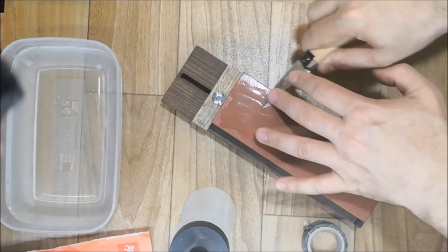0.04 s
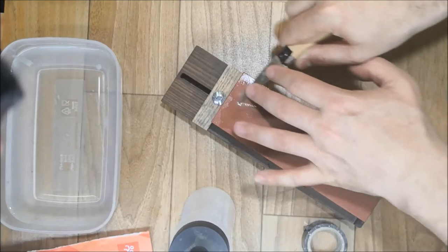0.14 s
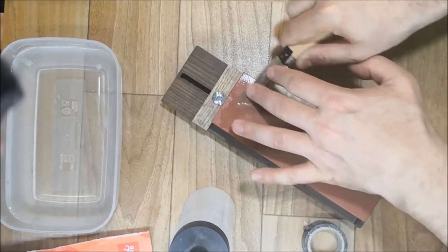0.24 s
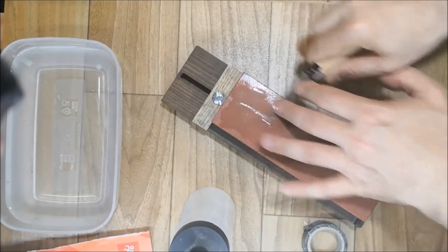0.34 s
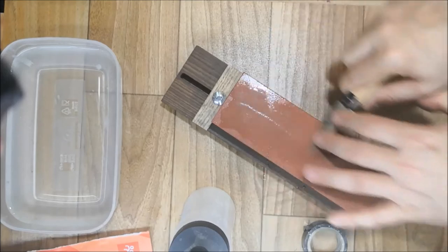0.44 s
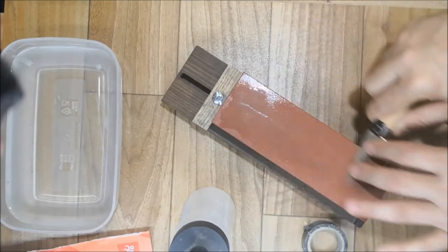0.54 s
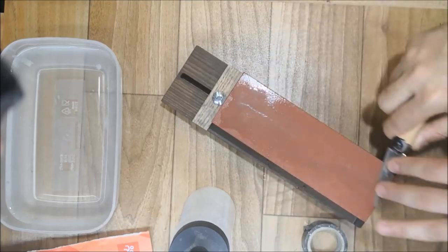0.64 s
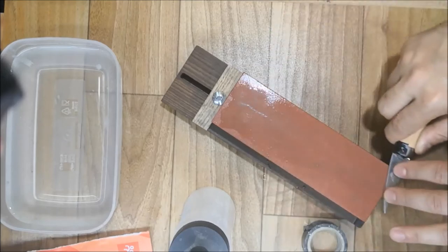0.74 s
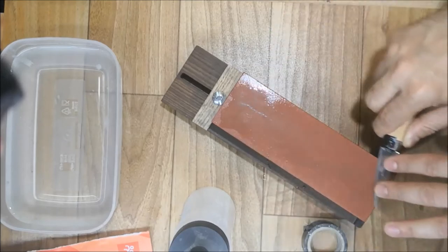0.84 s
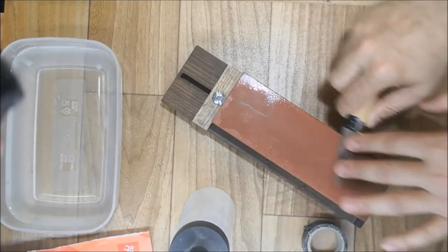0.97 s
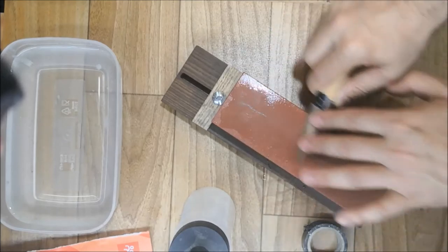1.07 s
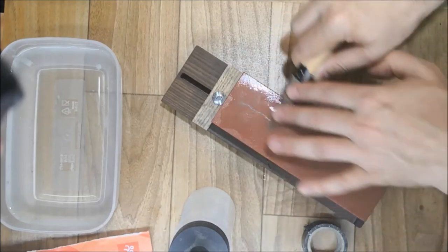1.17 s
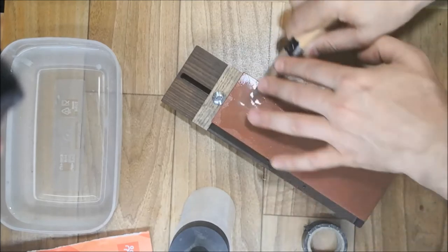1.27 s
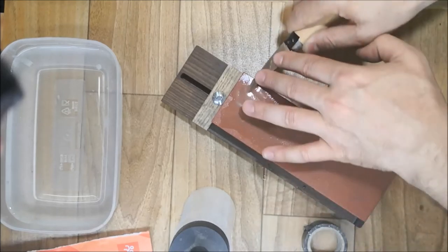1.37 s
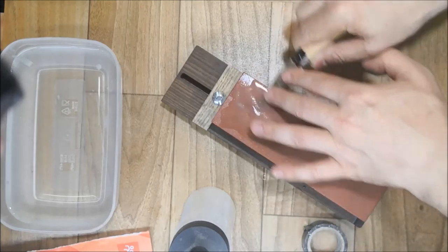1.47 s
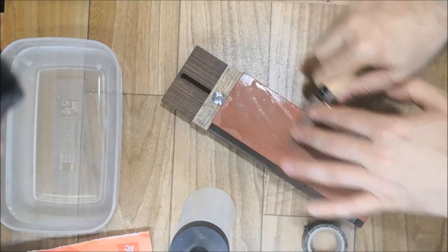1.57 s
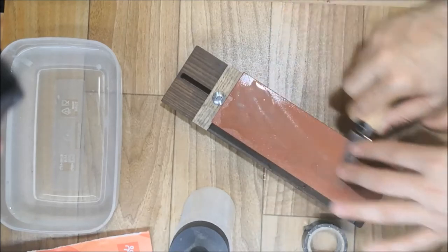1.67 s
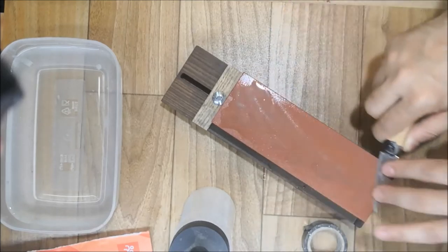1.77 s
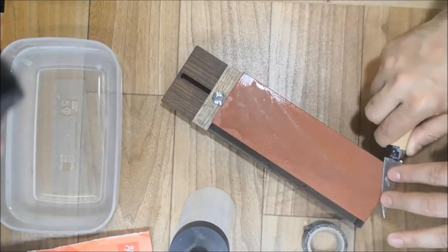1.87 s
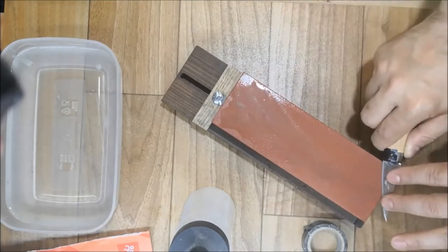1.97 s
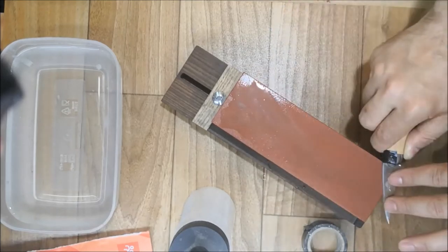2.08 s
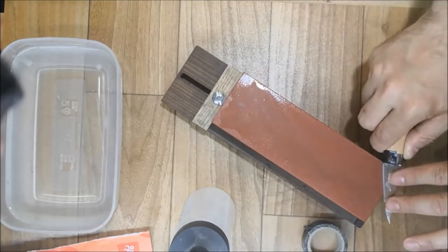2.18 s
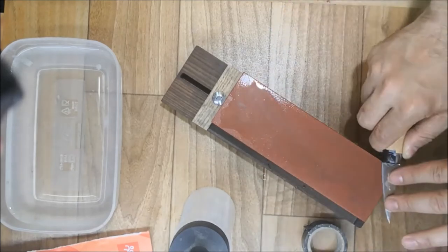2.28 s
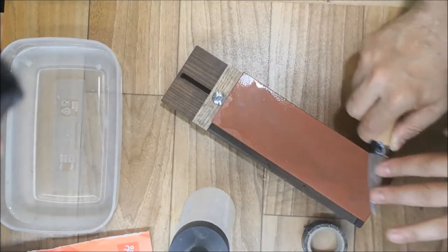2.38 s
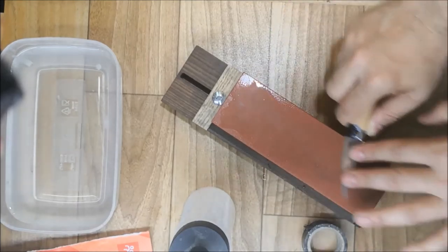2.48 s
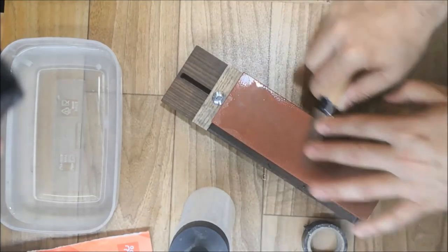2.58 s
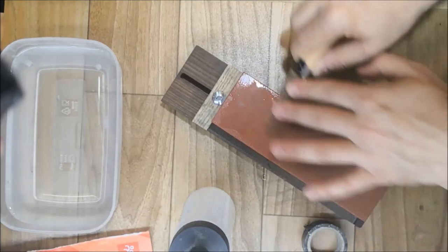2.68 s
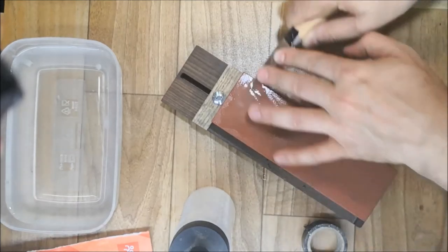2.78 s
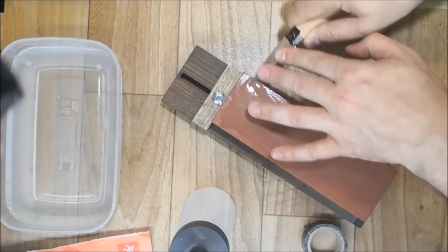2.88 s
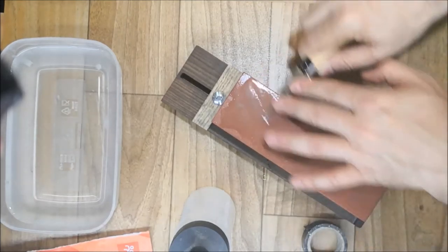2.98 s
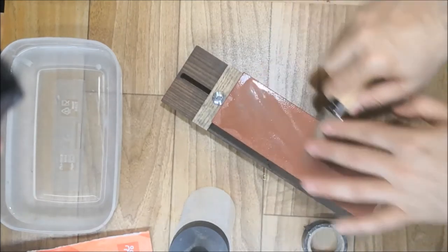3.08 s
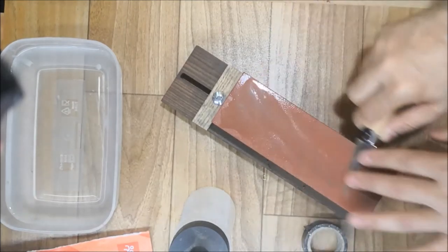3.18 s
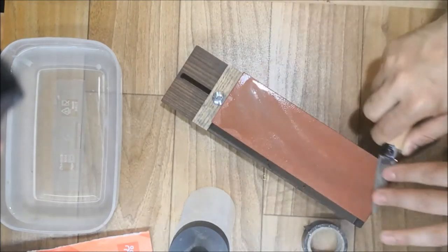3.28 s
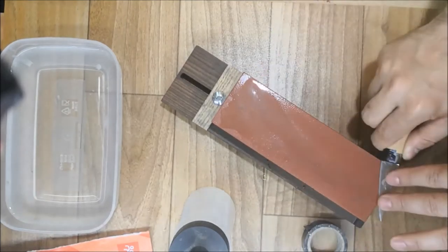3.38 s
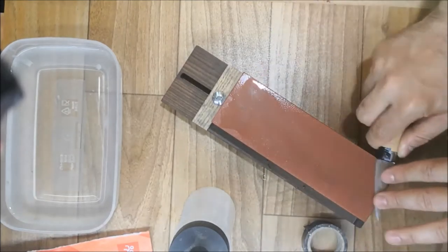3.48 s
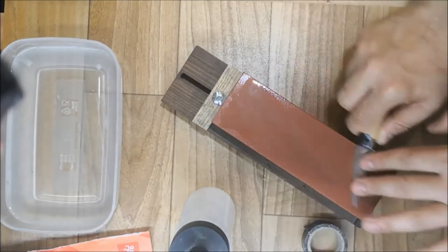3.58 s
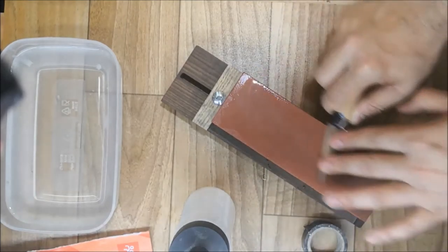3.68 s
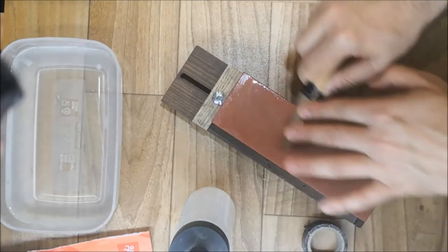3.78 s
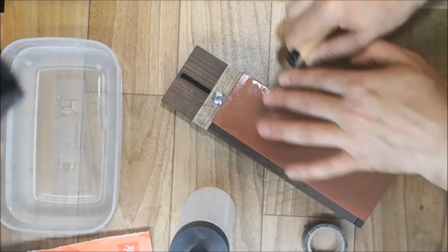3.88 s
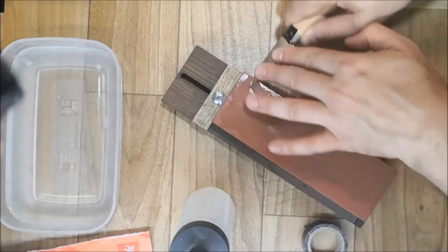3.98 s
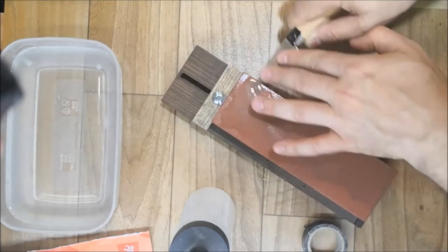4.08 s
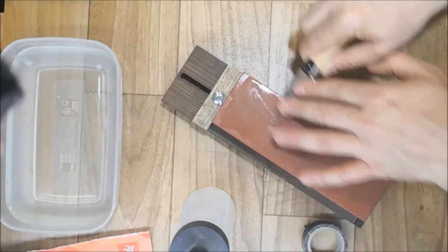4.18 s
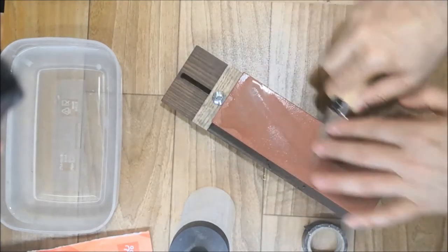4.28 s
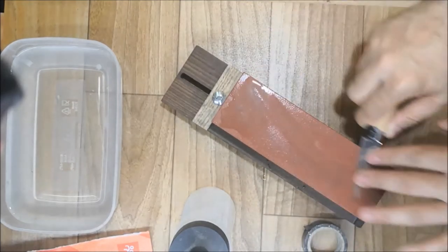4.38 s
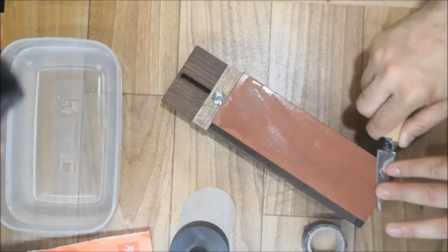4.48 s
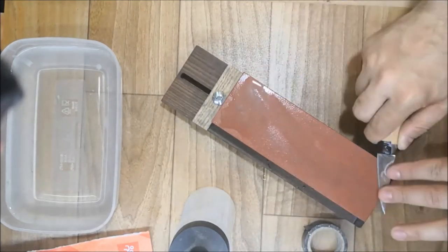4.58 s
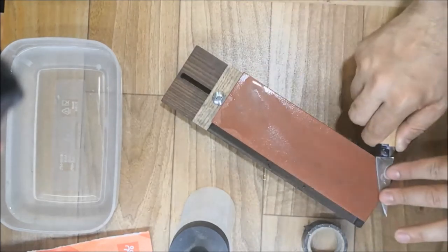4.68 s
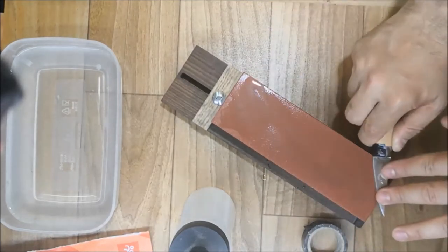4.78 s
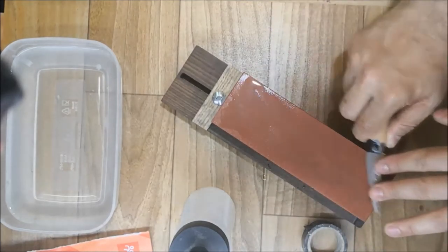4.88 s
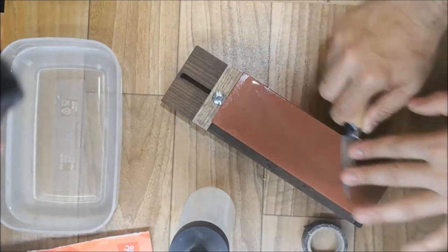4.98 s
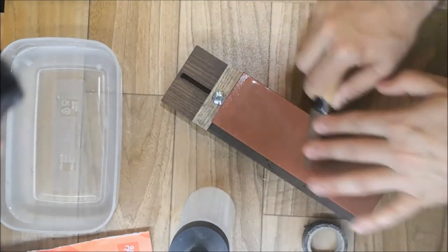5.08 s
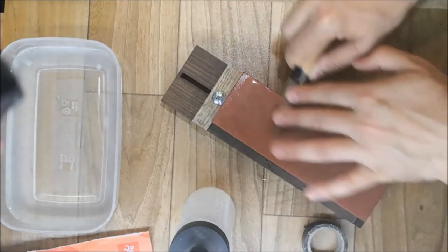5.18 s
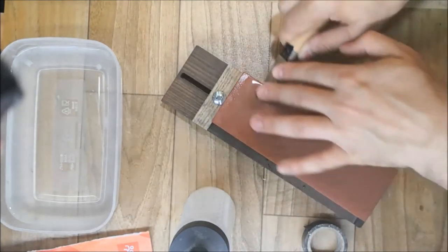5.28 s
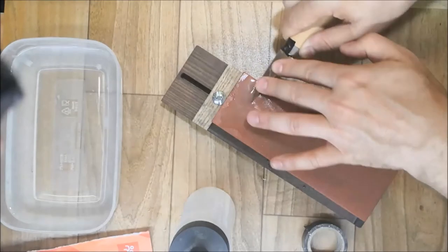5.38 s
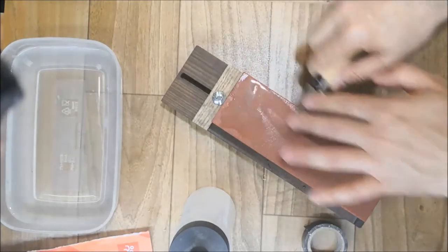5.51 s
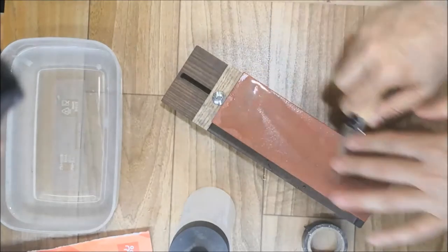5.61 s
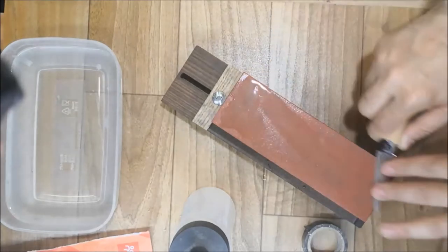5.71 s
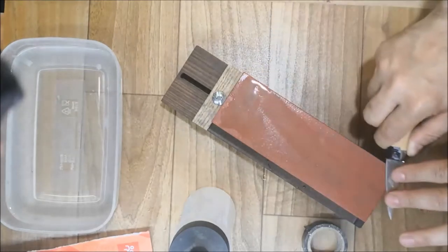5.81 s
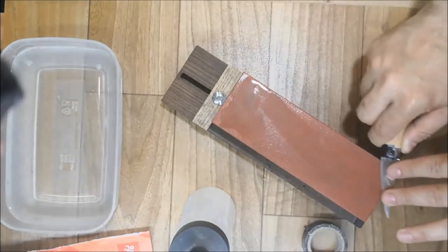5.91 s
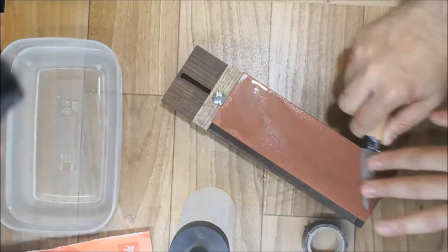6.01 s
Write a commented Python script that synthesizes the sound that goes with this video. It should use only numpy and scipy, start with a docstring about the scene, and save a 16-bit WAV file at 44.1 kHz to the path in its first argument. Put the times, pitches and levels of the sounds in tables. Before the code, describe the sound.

A small knife is sharpened on a wet whetstone, heard close in wide stereo in a quiet, dry workshop. Quick, softer rubs fill the first half second, then a pull runs to about 1.0 s and a push follows straight on until 1.6. Another pull, with gritty catches near 1.9, ends around 2.1. Faint nudges and near silence last until 2.5. Push and pull then alternate: push 2.5-3.1, pull to 3.7, push to 4.3, pull to 4.8, with a tiny falling squeak at 4.6. After a quiet pause with slight touches, a push starts at 5.06, and the last pull runs from 5.6 to about 6.1, squeaking briefly near 5.85. The scrapes are bright, sandy hiss with lower rasp and gliding steel resonances, often rising in the pulls. Soft low holder thuds and bench judder sit underneath, notably near 1.85, 3.0 and 5.87, with a barely audible low drone around 1.1 and 5.1.

```python
"""A small knife is pushed and pulled along a wet whetstone: gritty noise, split into bright hiss and lower rasp.
Blade resonances glide through the noise as the contact slides, and brief falling tones squeak at two moments.
The bench below sways, judders and thuds as filtered noise; a faint low drone swells twice.
Decaying stereo noise answers the knife as bench and walls, over the still air of a quiet workshop."""
import sys
import numpy as np
from scipy import signal
from scipy.fft import rfft, irfft, next_fast_len
from scipy.io import wavfile
from scipy.ndimage import uniform_filter1d

SR = 44100
rng = np.random.default_rng(int(sys.argv[2]) if len(sys.argv) > 2 else 0)


def wrap_up_sound(samples):
    """Save the sound to the file named by the first command line argument, as 16-bit audio."""
    columns = np.atleast_2d(samples).T
    # keep every value between -1 and 1, then stretch to whole-number steps
    tamed = np.clip(columns, -1, 1)
    steps = np.round(tamed * 32767).astype(np.int16)
    wavfile.write(sys.argv[1], SR, steps)


N = 266805
TIME = np.arange(N) / SR


def amp(db):
    """Decibels to gain."""
    return 10 ** (np.asarray(db) / 20)


def unit(x):
    """Scale to rms 1."""
    return x / np.sqrt(np.mean(x ** 2) + 1e-20)


def along(points, hz, axis=1):
    """Read one column of a (f/Hz, ..) table on a log-frequency axis."""
    table = np.transpose(points)
    return np.interp(np.log(hz + 1), np.log(table[0] + 1), table[axis])


def wobble(rate):
    """A random curve of rms 1, with rate knots a second."""
    knots = rng.standard_normal(int(N * rate / SR) + 4)
    return unit(np.interp(TIME * rate, np.arange(len(knots)), knots))


def filtered(x, response):
    """Multiply the spectrum of x by a response that is a function of frequency."""
    size = next_fast_len(N + 4096, real=True)
    spectrum = rfft(x, size) * response(np.fft.rfftfreq(size, 1 / SR))
    return irfft(spectrum, size)[..., :N]


def coloured(x, spectrum):
    """Shape x by (f/Hz, level/dB) points."""
    return filtered(x, lambda hz: amp(along(spectrum, hz)))


def rumble(spectrum, width):
    """Coloured stereo noise of rms 1; width is the share of the side signal."""
    mid, side = coloured(rng.standard_normal((2, N)), spectrum)
    return unit(np.array([mid + width * side, mid - width * side]))


def murmur(hz, width_hz):
    """A narrow band of noise of rms 1."""
    return unit(filtered(rng.standard_normal(N), lambda f: 1 / (1 + ((f - hz) / width_hz) ** 4)))


# colour of the still workshop: (f/Hz, relative level/dB)
AIR_COLOUR = [(25, 11), (65, -17), (150, -14.5), (300, -11), (600, -20), (1300, -11), (2700, -15.5),
              (4000, -23.5), (7500, -22), (10000, -27), (15000, -32)]


def still_air():
    """The still workshop is wide, steady noise."""
    return amp(-73.0) * rumble(AIR_COLOUR, width=0.94)


# swells of the low drone: (centre t/s, half length/s, level/dB)
DRONE_SWELLS = [(1.14, 0.37, -75), (5.104, .45, -78)]


def drone():
    """A faint low drone, a narrow band of noise, comes and goes."""
    swell = sum(amp(db) * np.exp(-((TIME - centre) / half) ** 2) for centre, half, db in DRONE_SWELLS)
    return swell * murmur(hz=269, width_hz=25)


# bench sway under resting hands, and what the height of a push adds
SWAY_REST_DB, SWAY_PUSH_DB = -78, -61.5
# holder judder at rest, and what full sliding speed and the height of a push add
JUDDER_REST_DB, JUDDER_SLIDE_DB, JUDDER_PUSH_DB = -83, -80, -77.5
# where in a push the hands lean hardest, and for how long (shares of the stroke)
LEAN_AT, LEAN_WIDTH = 0.56, 0.24
# each jolt is a narrow thud and a broad rattle, trimmed separately
JOLT_RISE_S, THUD_WIDTH_HZ, THUD_DB, JOLT_RATTLE_DB = 0.018, 45, -2.5, -4
# colour of the bench top swaying: (f/Hz, relative level/dB)
SWAY_COLOUR = [(20, -18.5), (50, -19.5), (64, -3.5), (80, -18), (130, -39.5), (400, -90)]
# colour of the stone holder juddering: (f/Hz, relative level/dB)
JUDDER_COLOUR = [(50, -32.5), (100, 3.5), (165, 0.5), (230, -8), (300, -10), (420, -19), (560, -26),
                 (1500, -56)]
# the stone holder jolts on the bench: (t/s, level/dB before rise and trims, decay time/s, thud f/Hz)
HOLDER_JOLTS = [(0, -65.5, 0.11, 69.6), (.8, -66, 0.2, 172), (1.36, -74, 0.03, 64),
                (1.845, -54, 0.048, 146), (1.98, -62, 0.055, 131), (2.68, -72, 0.025, 69.6),
                (3.009, -52, 0.058, 160), (3.489, -61, .1, 150), (3.62, -62, 0.1, 120),
                (3.8, -79, 0.11, 64), (4.08, -63, 0.05, 100), (5.866, -55, 0.089, 150)]


def bench():
    """The bench top sways as the hands lean into each push; the stone holder judders and jolts on it."""
    lean = np.zeros(N)
    for start, end, *_ in PUSH_STROKES:
        share = (TIME - start) / (end - start)
        lean += np.exp(-((share - LEAN_AT) / LEAN_WIDTH) ** 2)
    sliding = sum(speed(progress(start, end), PULL_RUN) for start, end, *_ in PULL_STROKES + PUSH_STROKES)
    sway = amp(SWAY_REST_DB) + amp(SWAY_PUSH_DB) * lean
    judder = amp(JUDDER_REST_DB) + amp(JUDDER_SLIDE_DB) * sliding + amp(JUDDER_PUSH_DB) * lean
    thuds = np.zeros(N)
    for s, db, decay, hz in HOLDER_JOLTS:
        age = np.maximum(TIME - s, 0)
        jolt = amp(db) * (1 - np.exp(-age / JOLT_RISE_S)) * np.exp(-age / decay)
        judder = judder + amp(JOLT_RATTLE_DB) * jolt
        thuds += amp(THUD_DB) * jolt * murmur(hz, THUD_WIDTH_HZ)
    swaying = sway * rumble(SWAY_COLOUR, width=0.087)
    juddering = judder * rumble(JUDDER_COLOUR, width=0.34)
    return swaying + juddering + thuds


def tail(t60, size):
    """A stereo noise decay of energy 1 a side; t60 is a function of frequency."""
    hz, t, cells = signal.stft(rng.standard_normal((2, size)), SR, nperseg=128)
    fade = amp(-60 * t / t60(hz)[:, None])
    decay = signal.istft(cells * fade, SR, nperseg=128)[1]
    return decay / np.linalg.norm(decay, axis=1, keepdims=True)


def echo(x, response):
    """Send x through a stereo impulse response."""
    return signal.fftconvolve(np.atleast_2d(x), response, axes=1)[:, :N]


# decay of the walls' answer: (f/Hz, t60/s)
WALL_DECAY = [(200, 0.21), (3000, 0.07), (12000, 0.11)]


def room(knife):
    """Things standing on the bench answer at once and comb the spectrum; the walls answer faintly."""
    near = amp(-4.0) * tail(lambda hz: np.full_like(hz, .08), size=SR // 3)
    walls = amp(-18.0) * tail(lambda hz: along(WALL_DECAY, hz), size=SR // 3)
    return echo(knife, near + walls)


# the two microphones: (f/Hz, left-right correlation before the closeness factor, left-right level/dB)
MIC_PORTS = [(570, -0.51, -0.5), (1430, 0.71, -2.5), (1840, -0.28, -7.5), (2240, -0.038, 5.5),
             (2682, -0.023, 3.5), (2780, -0.3, 4.5), (3100, -0.035, 3.5), (4080, -0.37, -5),
             (5270, 0.35, -0.5), (6130, 0.35, 7), (6970, -0.17, 5), (7470, 0.67, -1.5), (7620, 0.044, -6),
             (11500, -0.056, 1)]


def microphones(paths, closeness):
    """Both ports share the direct sound, in or out of phase; each gets its own scatter from hands and bench."""
    def alike(hz):
        return np.clip(closeness * along(MIC_PORTS, hz), -.95, .95)

    def shared(hz):
        sides = np.array([np.ones_like(hz), np.sign(alike(hz))])
        return np.sqrt(abs(alike(hz))) * sides

    direct = filtered(paths[0], shared)
    scattered = filtered(paths[1:], lambda hz: np.sqrt(1 - abs(alike(hz))))
    return filtered(direct + scattered, lambda hz: amp(np.outer([.5, -.5], along(MIC_PORTS, hz, axis=2))))


# the grit unsettles a squeak's pitch and level
SQUEAK_WAVER_HZ, SQUEAK_FLUTTER_DB = 45, 2.5
# stick-slip squeaks, before waver and flutter:
# (centre t/s, half length/s, f/Hz at centre, fall/Hz per s, peak level/dB, octave level/dB relative)
STICK_SLIPS = [(4.599, 0.006, 2920, 20000, -24.5, -23), (4.622, .011, 2950, 3000, -39, -14),
               (5.836, 0.005, 3070, 6000, -31, -8), (5.8495, .0065, 2900, 22000, -22.5, -12),
               (5.865, .007, 2980, 5000, -35, -9)]


def squeaks(right_db):
    """The edge locks into a brief falling tone, which reaches the two ports in opposite phase."""
    out = np.zeros(N)
    waver = SQUEAK_WAVER_HZ * wobble(400)
    flutter = amp(SQUEAK_FLUTTER_DB * wobble(300))
    for centre, half, hz, fall, db, octave_db in STICK_SLIPS:
        on = abs(TIME - centre) < 4 * half
        t = TIME[on] - centre
        phase = 2 * np.pi * np.cumsum(hz - fall * t + waver[on]) / SR
        tone = np.sin(phase) + amp(octave_db) * np.sin(2 * phase)
        out[on] += amp(db) * flutter[on] * np.exp(-(t / half) ** 2) * tone
    return np.array([out, -amp(right_db) * out])


def grit(rate, size_db, slurry_db, chatter_db, lurch_db):
    """Uneven grains over smooth slurry, gripping and slipping, sent along three paths: direct, left, right."""
    hit = rng.random(N) < rate / SR  # rate in grains per second
    size = amp(size_db * np.minimum(rng.exponential(size=N), 4))
    grains = unit(hit * size * rng.standard_normal((3, N)))
    slurry = amp(slurry_db) * rng.standard_normal((3, N))
    grip = amp(chatter_db * wobble(420) + lurch_db * wobble(67))
    return unit((grains + slurry) * grip)


def resonate(x, hz, width_hz):
    """A one-pole resonance of peak gain 1 whose centre hz may move from sample to sample."""
    carrier = np.exp(2j * np.pi * np.cumsum(hz) / SR)
    pole = np.exp(-np.pi * abs(width_hz) / SR)
    smoothed = signal.lfilter([1 - pole], [1, -pole], x / carrier)
    return 2 * (smoothed * carrier).real


RUB_WIDTH_HZ = 290  # a rub barely moves the contact, so its resonance stays put
# resonances of every push: (from share of the stroke, to share, start f/Hz, end f/Hz, width/Hz, boost/dB)
PUSH_RINGS = [(-.15, 0.3, 4550, 4700, 300, 4), (0.5, 0.88, 3800, 5200, 800, 2),
              (-.2, .3, 2700, 2700, 130, 9), (.3, 1, 2660, 2720, 150, 2)]
# the blade rings as it bites into every pull: (from share, to share, start f/Hz, end f/Hz, width/Hz, boost/dB)
PULL_RINGS = [(-0.29, 0.44, 2700, 3400, 330, 5)]
# resonances that swell, glide and fade as the contact travels along the edge;
# negative boost is a dip where the fingers damp the steel:
# (start t/s, end t/s, start f/Hz, end f/Hz, width/Hz, boost/dB)
EDGE_GLIDES = [(.3, .64, 5900, 6150, 200, 9), (.58, .8, 6300, 7000, 450, 7), (.76, .84, 6950, 6900, 500, 5),
               (.77, .9, 4950, 4830, 320, 16.5), (.66, .98, 2850, 2700, 450, 4.5),
               (1.6, 1.85, 2920, 3150, 300, 2.5), (1.64, 1.86, 6000, 6350, 250, 6.5),
               (1.8, 2.1, 1620, 2420, 240, 11.5), (1.84, 2, 5050, 4300, 600, 8.5),
               (1.94, 2.04, 3050, 2800, 300, 9.5), (1, 1.5, 2730, 2720, 301, 3.5),
               (2.42, 2.7, 4650, 4640, 261, 6), (2.82, 2.96, 3900, 4500, 700, 2.5),
               (2.86, 2.93, 2700, 2700, 200, 6), (3.04, 3.22, 5980, 6050, 200, 10.5),
               (3.25, 3.63, 1680, 2800, 230, 15), (3.29, 3.39, 4900, 4500, 900, 7.5),
               (3.37, 3.48, 3100, 3040, 221, 7.5), (3.38, 3.62, 3900, 3700, 800, -1),
               (3.4, 3.62, 5800, 6750, 450, 10.5), (3.98, 4.26, 2710, 2780, 500, 3),
               (4.08, 4.25, 4330, 5240, 890, 2.5), (5.37, 5.53, 2660, 2820, 350, 7),
               (5.56, 5.72, 7700, 7300, 896, 6), (4.46, 4.78, 1650, 2950, 212, 12.5),
               (4.5, 4.72, 5400, 6450, 450, 7.5), (4.53, 4.63, 4600, 4400, 300, 11),
               (4.57, 4.72, 3850, 3650, 700, -12.5), (5.66, 5.96, 5250, 6000, 400, 9),
               (5.72, 5.83, 3260, 3200, 200, 10.5), (5.74, 6.05, 1700, 2800, 210, 14),
               (5.81, 5.88, 6100, 5500, 500, 8), (5.8, 6.02, 4200, 3900, 1000, -6.5),
               (5.91, 6.05, 6750, 6600, 400, 6)]


def glides():
    """Collect the resonances of every stroke as (start t/s, end t/s, start f/Hz, end f/Hz, width/Hz, boost/dB)."""
    rows = [(start, end, hz, hz, RUB_WIDTH_HZ, db) for start, end, _, hz, db in SHORT_RUBS]
    for table, shared in ((PUSH_STROKES, PUSH_RINGS), (PULL_STROKES, PULL_RINGS)):
        for start, end, *_ in table:
            length = end - start
            rows += [(start + a * length, start + b * length, *ring) for a, b, *ring in shared]
    return rows + list(EDGE_GLIDES)


GLIDE_BEND = 1.63  # a glide starts slowly and hurries toward its end: the power of time that it follows
# standing resonances of knife and stone holder, before drift: (f/Hz, width/Hz, level/dB relative to the grit)
STEADY_RINGS = [(2700, 140, -28), (6870, 250, -23), (7640, 250, -24)]


def blade(force, drift):
    """Some resonances only drift with finger pressure; others glide as the free length of steel changes."""
    out = force.copy()
    stiffness = 1 + drift * wobble(5.6)
    for hz, width, db in STEADY_RINGS:
        out += amp(db) * unit(resonate(force, hz * stiffness, width))
    for start, end, from_hz, to_hz, width, db in glides():
        on = slice(max(0, round(start * SR)), min(N, round(end * SR)))
        travel = np.linspace(0, 1, on.stop - on.start) ** GLIDE_BEND
        ring = resonate(out[:, on], from_hz + (to_hz - from_hz) * travel, width)
        swell = np.sqrt(abs(np.sin(np.pi * travel)))
        out[:, on] += (amp(db) - 1) * swell * ring
    return out


def shifting(x, depth_db):
    """As knife and fingers travel, random patches of the spectrum swell and sink."""
    cells = signal.stft(x, nperseg=512)[2]
    field = rng.standard_normal(cells.shape[1:])
    field = uniform_filter1d(field, size=4, axis=0)  # smooth over frequency
    field = uniform_filter1d(field, size=16, axis=1)  # smooth over time
    return unit(signal.istft(cells * amp(depth_db * unit(field)), nperseg=512)[1][:, :N])


def scrape(steel, colour, hiss_gain, rasp_gain, split_hz):
    """A bright hiss from the edge and a lower rasp from the body of the blade."""
    sound = coloured(steel, colour)
    rasp = filtered(sound, lambda hz: 1 / (1 + (hz / split_hz) ** 12))
    return hiss_gain * unit(sound - rasp) + rasp_gain * unit(rasp)


# the edge touches down or catches on coarse grit: (t/s, level/dB before a shared trim and smoothing)
GRIT_CATCHES = [(0.111, -37), (0.4628, -25.5), (0.5465, -25), (0.577, -19), (0.5835, -28), (0.6729, -23),
                (0.7994, -26), (1.655, -39), (1.7923, -24), (1.8094, -25), (1.8868, -13.5), (1.9078, -12.5),
                (2.208, -52), (2.243, -43), (2.523, -39.5), (2.92, -21), (2.939, -21), (3.1168, -34.5),
                (3.132, -39), (3.221, -21), (3.3, -13.5), (3.653, -42), (3.7074, -46), (4.3002, -41),
                (4.798, -39), (4.869, -57), (4.969, -38), (5.632, -43), (5.643, -34)]


def catches(life, level_db):
    """Each catch is a few milliseconds of harder grinding that dies away exponentially."""
    blows = np.zeros(N)
    for s, db in GRIT_CATCHES:
        blows[round(s * SR)] = amp(db + level_db)
    return signal.lfilter([1], [1, -np.exp(-1 / (life * SR))], blows)


def progress(start, end):
    """How much of a stroke is done, 0 to 1."""
    return np.clip((TIME - start) / (end - start), 0, 1)


def speed(done, motion):
    """The edge breaks away with a jerk; the hand speeds up, runs evenly and slows to the turn."""
    jerk, rise, fall = motion[:3]
    rising = jerk + (1 - jerk) * np.sin(np.pi / 2 * np.minimum(done / rise, 1))
    falling = np.sin(np.pi / 2 * np.minimum((1 - done) / fall, 1))
    return (done > 0) * rising * falling


GRIND_POWER = 3.26  # hiss grows as this power of the speed, since the hand presses harder as it goes faster
FULL_DB, DULLING = -42, 0.11  # a lighter touch is duller: dB of extra rasp for each dB under a full stroke
# the pull eases as it reaches the tip: by how much, where and how gradually (shares of the stroke)
TIP_FADE_DB, TIP_AT, TIP_BLEND = -1, 0.24, 0.031


def effort(motion, bite_s, start, end, db, swell_db=0, tip=0):
    """Gains of hiss and rasp for one stroke; both follow the speed once the edge has taken hold."""
    gains = np.zeros((2, N))
    first_db, last_db = motion[3:]
    on = (TIME > start) & (TIME < end)
    done = progress(start, end)[on]
    hold = 1 - np.exp((start - TIME[on]) / bite_s)
    at_tip = tip / (1 + np.exp((TIP_AT - done) / TIP_BLEND))
    pressure_db = db + swell_db * (done - .5) + TIP_FADE_DB * at_tip
    hiss_db = pressure_db + GRIND_POWER * 20 * np.log10(abs(speed(done, motion)) + 1e-6)
    balance_db = first_db + (last_db - first_db) * done
    rasp_db = hiss_db + balance_db + DULLING * (FULL_DB - hiss_db)
    gains[:, on] = hold * amp([hiss_db, rasp_db])
    return gains


BITE_S, CREEP_S = 0.027, 0.014  # how fast the edge takes hold: in pulls and rubs, in pushes
# how each kind of stroke runs: (share of full speed at breakaway, share of the stroke spent speeding up,
# share spent slowing down, rasp level/dB relative to the hiss at the start, same at the end; before dulling)
PUSH_RUN = (0.44, 0.4261, 0.278, -8, -7.5)
PULL_RUN = (0.8037, 0.2832, 0.4952, -9.5, -4.5)
RUB_RUN = (0.7456, 0, 0.7043, -5, -1)
# colour of the scrape going out: (f/Hz, relative level/dB)
AWAY_COLOUR = [(200, -26), (780, -28.5), (1250, -19.5), (2300, -9), (2850, -5), (3450, -5.5), (4800, -3.5),
               (5700, -6), (6900, 2.5), (8050, -0.5), (8450, -14), (9800, -27.5), (10800, -17.5),
               (15000, -20)]
# colour of the scrape coming back: (f/Hz, relative level/dB)
BACK_COLOUR = [(200, -35), (720, -36.5), (1250, -27), (2150, -19.5), (2800, -7), (3450, -12), (4800, -5.5),
               (5700, -9.5), (6900, 0), (7450, 2.5), (8050, -3), (8450, -15), (9800, -31.5), (10800, -19),
               (15000, -20.5)]
# stroke levels below are at full speed, before a trim for each direction
# short rubs, and faint nudges while the knife is reset:
# (start t/s, end t/s, level/dB, resonance f/Hz, boost/dB)
SHORT_RUBS = [(-.08, 0.13, -43, 5950, 16.5), (.108, 0.34, -45, 5990, 14.5),
              (0.289, 0.488, -43.5, 5700, 9.5), (2.105, 2.253, -74.5, 7060, 6),
              (2.191, 2.297, -64.5, 2700, 3.5), (2.28, 2.398, -75.5, 7650, 8), (3.6, 3.732, -68, 4650, 8.5),
              (4.72, 5.197, -75, 2700, -0.5), (4.84, 4.91, -76, 2000, 13.5),
              (4.905, 5.032, -70, 1980, 15.5), (5.02, 5.105, -70.5, 2720, 1)]
# the knife is pulled back: (start t/s, end t/s, level/dB, swell from start to end/dB,
# part of the edge worked: 0 heel to 1 tip)
PULL_STROKES = [(0.46, 1.036, -39.5, 0, 0.08), (1.639, 2.151, -38, 9.5, 0.51),
                (3.112, 3.674, -39.5, 3, 0.8), (4.298, 4.83, -39.5, -0.5, 0.56),
                (5.612, 6.093, -40.5, 0, 0.69)]
# the knife is pushed away along the stone: (start t/s, end t/s, level/dB, swell from start to end/dB)
PUSH_STROKES = [(0.996, 1.639, -40, 2.5), (2.503, 3.139, -40.5, 9.5), (3.693, 4.343, -39.5, -2.5),
                (5.06, 5.637, -40.5, -1.5)]


def strokes(steel, push_db, pull_db, unsteady_db):
    """Pushing and pulling share the grit but colour it differently; the hand's pressure is never quite even."""
    push = amp(push_db) * sum(effort(PUSH_RUN, CREEP_S, *row) for row in PUSH_STROKES)
    pull = amp(pull_db) * sum(effort(PULL_RUN, BITE_S, *row) for row in PULL_STROKES)
    pull = pull + amp(pull_db) * sum(effort(RUB_RUN, BITE_S, *row[:3]) for row in SHORT_RUBS)
    caught = uniform_filter1d(catches(life=0.0041, level_db=-21.5), size=32)
    away = scrape(steel, AWAY_COLOUR, push[0], push[1], split_hz=3510)
    back = scrape(steel, BACK_COLOUR, pull[0] + caught, pull[1], split_hz=3820)
    return amp(unsteady_db * wobble(16)) * (away + back)


def knife_on_stone():
    """Grit drives the blade, the microphones spread it, and the strokes set its level and colour."""
    force = grit(rate=5000, size_db=2.0, slurry_db=-0.5, chatter_db=0.4, lurch_db=0.77)
    ringing = shifting(blade(force, drift=0.0065), depth_db=2.0)
    steel = microphones(ringing, closeness=1.52)
    return strokes(steel, push_db=-0.96, pull_db=-0.92, unsteady_db=0.49)


def scene():
    """Knife on stone with its squeaks, the room's answer, the bench, the drone and the still air."""
    knife = knife_on_stone()
    return knife + room(knife) + squeaks(right_db=-1.5) + still_air() + bench() + drone()


def record(dry):
    """The top end rolls off steeply at the band limit."""
    top_hz = 15550
    return filtered(dry, lambda hz: 1 / (1 + (hz / top_hz) ** 200))


dry = scene()
out = record(dry)
wrap_up_sound(out)
```